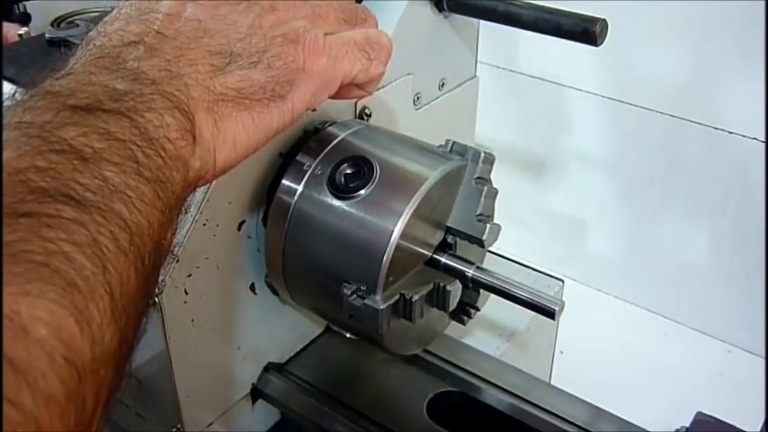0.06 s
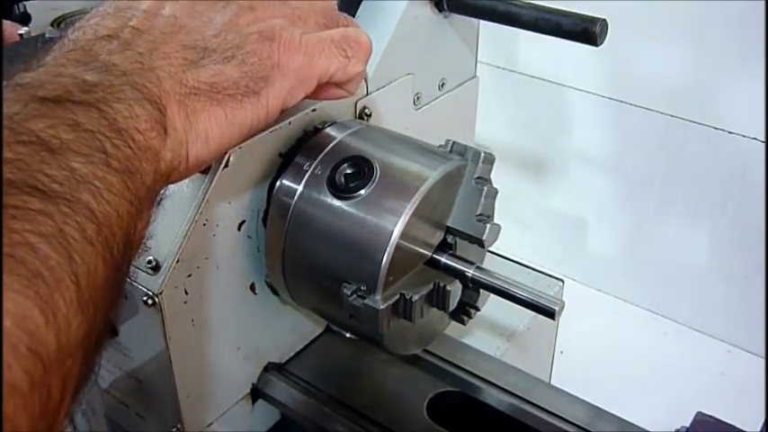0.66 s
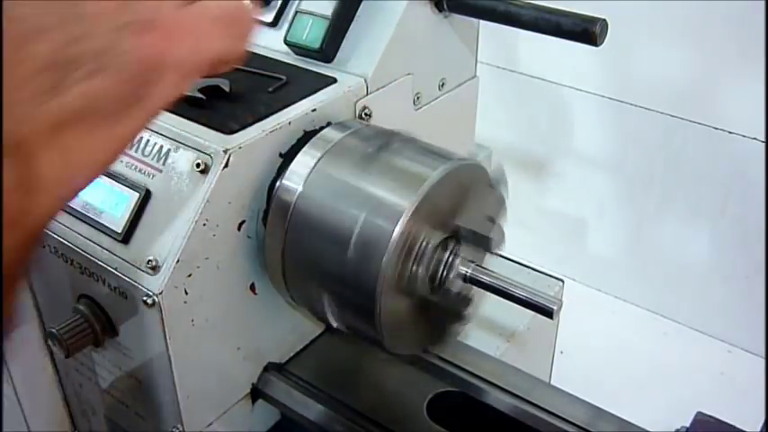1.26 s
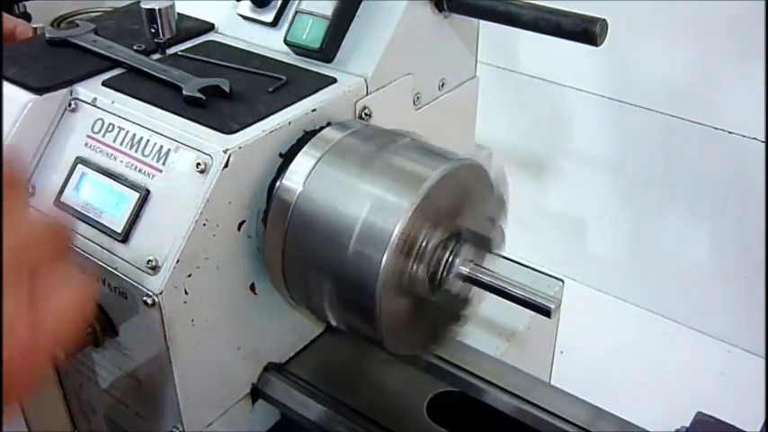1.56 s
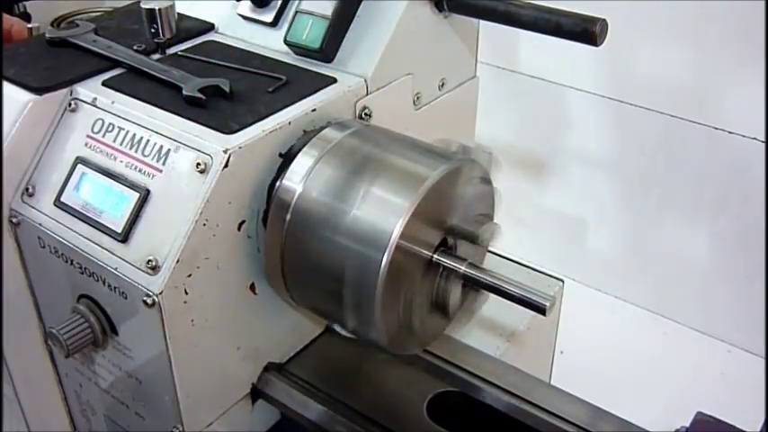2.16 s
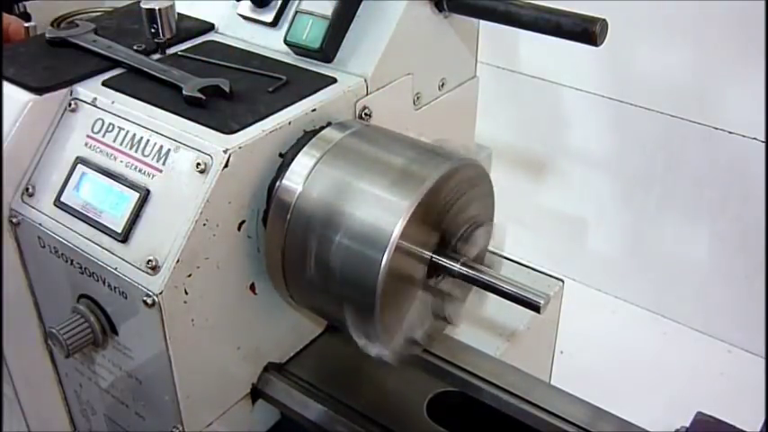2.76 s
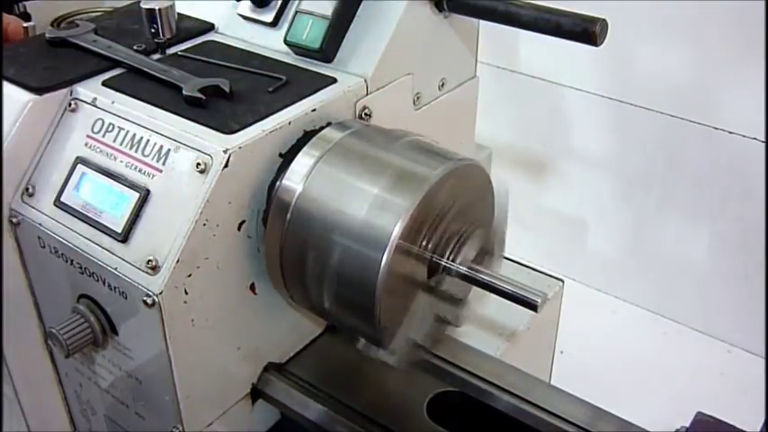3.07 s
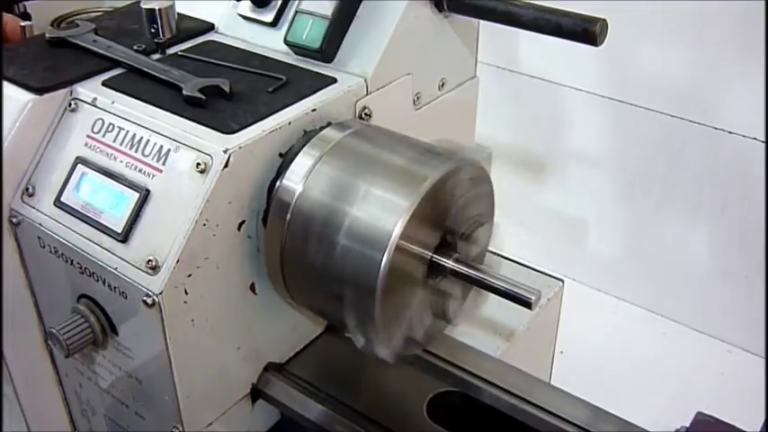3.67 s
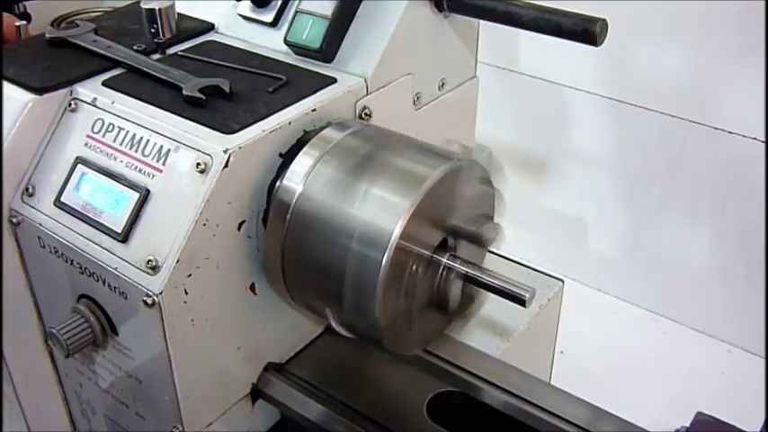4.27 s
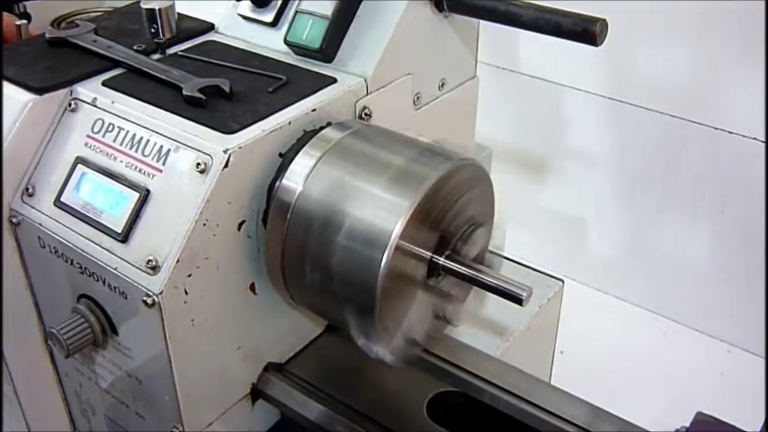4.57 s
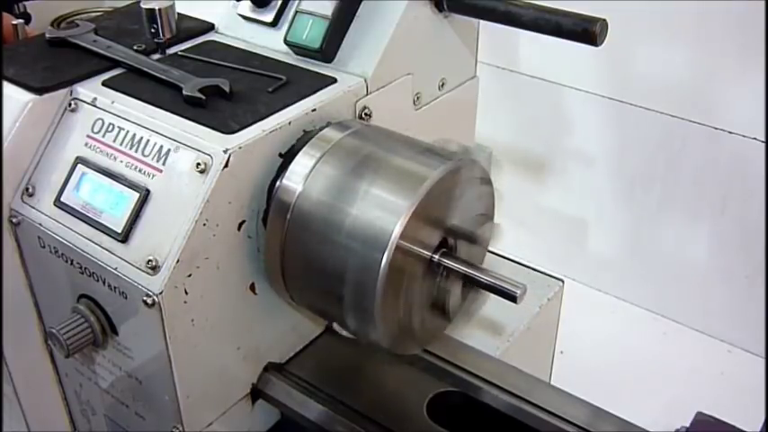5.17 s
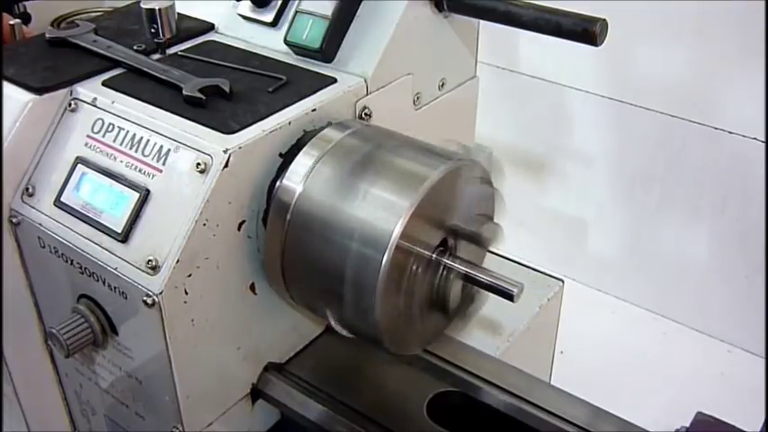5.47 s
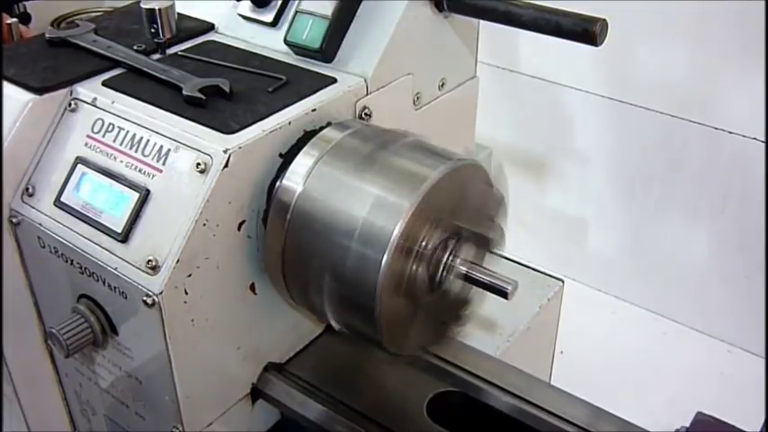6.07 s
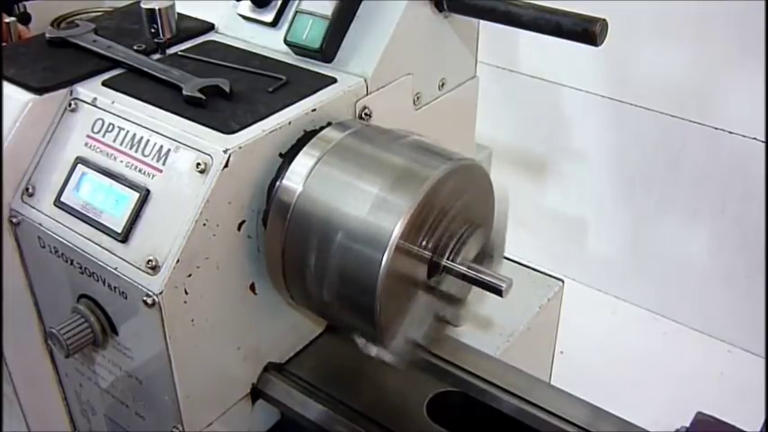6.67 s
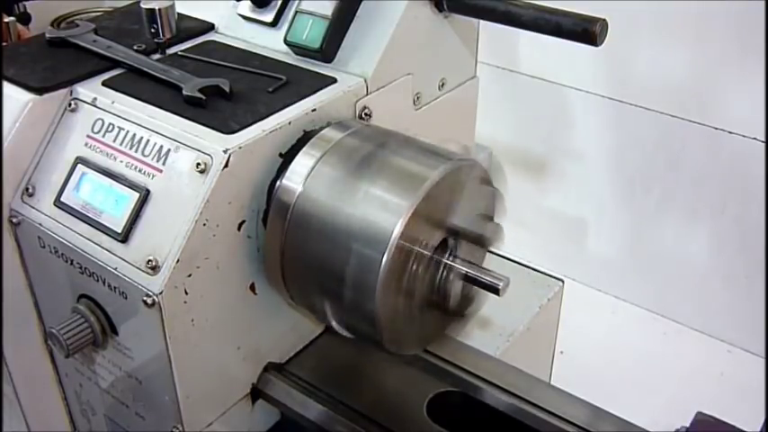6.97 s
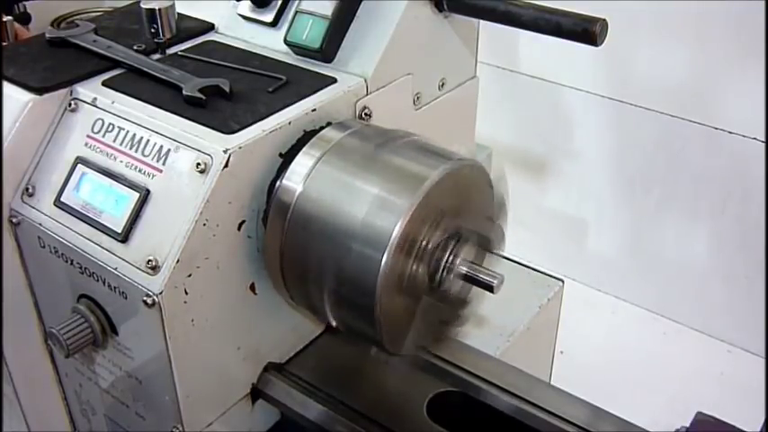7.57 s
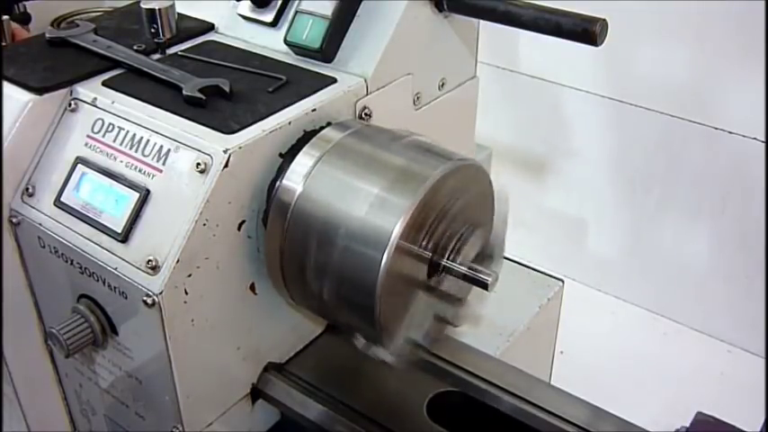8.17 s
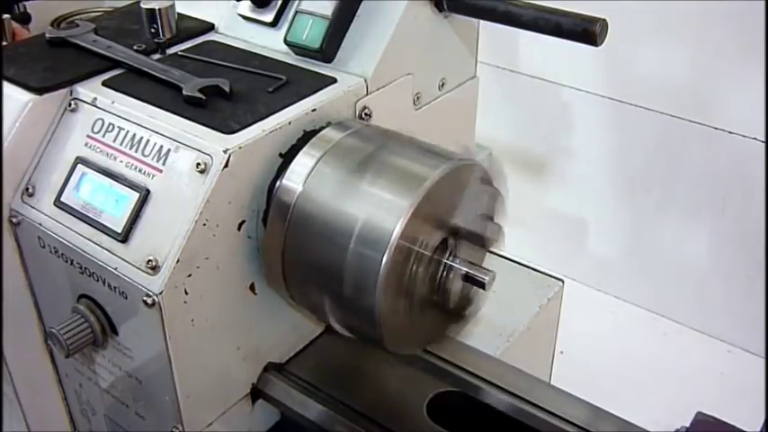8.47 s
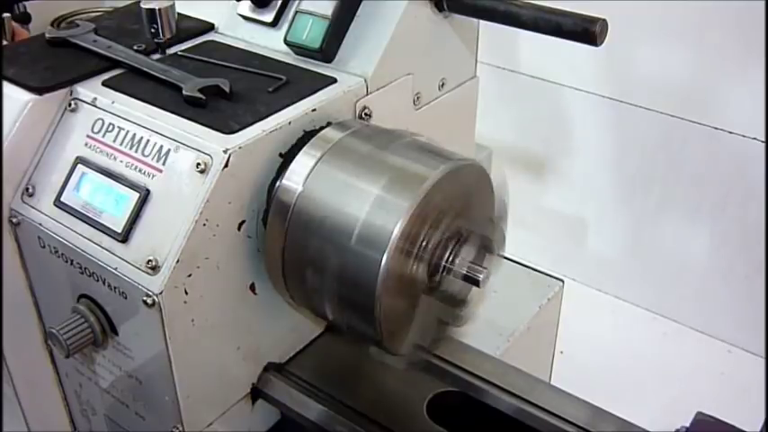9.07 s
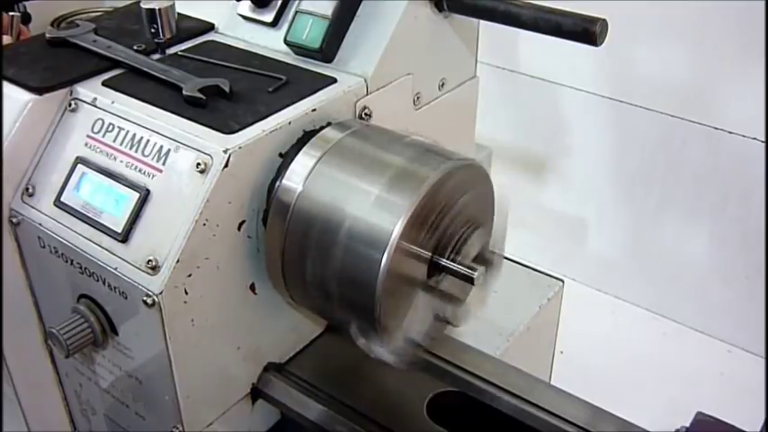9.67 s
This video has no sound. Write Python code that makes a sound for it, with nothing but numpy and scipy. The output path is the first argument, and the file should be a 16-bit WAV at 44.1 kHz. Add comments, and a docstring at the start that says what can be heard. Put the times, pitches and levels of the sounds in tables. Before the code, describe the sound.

After a click, a small lathe's electric motor buzzes to life, its rising whine settling into a steady, slightly wavering run.

```python
"""A small belt-driven metal lathe, switched on in a workshop and running without cutting.
A switch clicks, the mains-fed motor buzzes, and the whine of the drive teeth climbs to a steady,
slightly wavering pitch. Bearings and belt rumble in the sheet-metal headstock; the motor brushes
hiss, reflected by the nearby wall and chip tray. One narrow-band microphone, mono, with the
lathe in the foreground and the faint room tone of the shop behind it."""
import sys
import numpy as np
from scipy import signal
from scipy.fft import rfft, irfft, next_fast_len
from scipy.io import wavfile

SR = 44100
rng = np.random.default_rng(int(sys.argv[2]) if len(sys.argv) > 2 else 0)


def pcm_store(signal):
    """Save signal as 16-bit PCM."""
    levels = np.round(np.clip(np.atleast_2d(signal), -1, 1) * 32767)
    wavfile.write(sys.argv[1], SR, levels.astype(np.int16).T)


N = 432621
TIME = np.arange(N) / SR
WHEEL_TEETH, BELT_TEETH = 32, 141   # teeth passed per shaft turn, per belt lap
TOP_TOOTH_HZ, POWER_ON_S = 685.3, .82
MIC_CUTOFF_HZ = 8000


# Harmonics of the meshing teeth: (multiple of the tooth rate, level [dB], extra under load [dB])
TOOTH_HARMONICS = [(1, 0, 0), (2, -3.5, 3.5), (3, -1.5, -2), (4, -0.5, 1.5), (5, -4, 4), (6, -3.5, 2.5),
                   (7, -0.5, 0.5), (8, -3, 3.5), (9, -0.5, 3.5)]

def tooth_whine(rate, teeth, rough=0.17, rough_rise=0.016, start_rough=1.6, hardening=0.42):
    """Tooth harmonics flare on each mode they cross; the teeth chatter while gathering speed."""
    speed = rate / rate[-1]
    chatter = start_rough * np.clip(1 - speed, 0, 1)
    turn = tone(teeth / WHEEL_TEETH)
    whine = 0
    for k, db, load_db in TOOTH_HARMONICS:
        sharpness = speed ** (hardening * (k - 1))   # faster teeth strike more sharply
        strength = from_db(db + load_db * load(rate)) * sharpness
        pulse = rms_one(1 + 0.097 * k ** 0.47 * turn)   # an off-centre wheel presses harder once a turn
        line = rough_tone(k * teeth, rough + rough_rise * k + chatter)
        whine += strength * pulse * drive_gain(k * rate) * line
    belt_throb = 1 + 0.09 * tone(teeth / BELT_TEETH)
    return whine * belt_throb


# Modes through which the drive radiates: (frequency [Hz], width [Hz], peak gain [dB])
DRIVE_RESONANCES = [(244, 53, -55), (576, 26, -53), (603, 27, -48.5), (653, 11, -50), (686, 52, -50.5),
                    (850, 160, -63.5), (1071, 21, -53), (1650, 130, -60.5), (2366, 154, -58.5),
                    (2710, 50, -65.5), (2930, 55, -82.5), (3880, 40, -69.5), (4027, 120, -66.5),
                    (4500, 140, -72), (4690, 270, -71.5), (5200, 120, -74.5), (6130, 74, -74)]

def drive_gain(hz):
    """How strongly a line radiates while its pitch slides across the modes."""
    power = sum(from_db(db) ** 2 / (1 + (2 * (hz[::100] - centre) / width) ** 2)
                for centre, width, db in DRIVE_RESONANCES)
    return np.interp(TIME, TIME[::100], np.sqrt(power))


def rotation(spin_up_s=.605, belt_wow=0.0053, shaft_wow=0.0018, wander=0.001517, taut=0.63):
    """Tooth rate [Hz] and teeth passed: the motor's pull falls as it nears top speed."""
    rate = TOP_TOOTH_HZ * power_rise(spin_up_s)
    teeth = np.cumsum(rate) / SR
    slack = 1 - taut * load(rate)   # the belt sways more once the load eases
    belt_sway = belt_wow * slack * tone(teeth / BELT_TEETH)
    shaft_sway = shaft_wow * tone(teeth / WHEEL_TEETH)
    sway = belt_sway + shaft_sway + wander * drift(3.0)
    return rate, np.cumsum(rate * (1 + sway)) / SR


def power_rise(time_constant_s):
    """Exponential climb from 0 toward 1 once the motor has power."""
    return 1 - np.exp(-np.maximum(TIME - POWER_ON_S, 0) / time_constant_s)


def load(rate):
    """The drive pulls hard (1) until it has nearly reached its speed (0)."""
    return np.clip(45 * (1 - rate / rate[-1]), 0, 1)


# Buzz of the rectified mains: (multiple of the ripple rate, level [dB], extra during run-up [dB])
MAINS_BUZZ = [(1, -69, -0.5), (2, -53, -1), (3, -64.5, -5), (4, -57.5, 1.5), (5, -60, 2), (6, -70.5, 1),
              (7, -60.5, -2), (8, -66, -1), (10, -76, -0.5), (12, -66, 3.5), (13, -69.5, -0.5),
              (14, -72.5, -12), (16, -76.5, 5), (18, -81, -1), (19, -80.5, 0.5), (22, -82, 4.5),
              (24, -80.5, 0), (25, -82, 2.5)]

def motor_buzz(rate, ripple_hz=100.08, flutter=0.12):
    """Current pulses shake the motor, with a harder edge while it pulls up to speed."""
    pull = np.clip(6 * (1 - rate / rate[-1]), 0, 1)
    return sum(from_db(db + surge_db * pull) * tone(k * ripple_hz * TIME) * (1 + flutter * drift(7.8))
               for k, db, surge_db in MAINS_BUZZ)


# Rumble of the pulley: (multiple of its beat rate, level at top speed [dB])
PULLEY_LINES = [(2, -74.5), (3, -69), (4, -77.5)]
# Uneven teeth and bearings: (multiple of the shaft rate, level at top speed [dB])
UNEVEN_LINES = [(23, -65), (27, -58.5), (28, -69.5), (29, -73), (30, -62), (31, -73), (33, -65.5),
                (34, -65), (35, -67.5), (37, -67.5), (43, -68), (49, -77.5), (50, -72.5), (63, -67.5),
                (69, -68.5), (109, -83), (126, -76.5)]

def shaft_tones(rate, teeth, pulley_beats_per_tooth=.0804, rough=0.51, growth=2.5):
    """Pulley, uneven teeth and bearings add lines that grow with speed."""
    lines = sum(from_db(db) * tone(k * teeth * pulley_beats_per_tooth) for k, db in PULLEY_LINES)
    for k, db in UNEVEN_LINES:
        gain = drive_gain(k * rate / WHEEL_TEETH)
        lines += from_db(db) * gain / gain[-1] * rough_tone(k * teeth / WHEEL_TEETH, rough)
    return lines * (rate / rate[-1]) ** growth


# Smooth spectra of bearing rumble and brush hiss: (frequency [Hz], relative density [dB])
RUMBLE_SPECTRUM = [(45, -22.5), (80, -9), (130, -6), (200, 1.5), (350, -1), (560, -5.5), (800, 0),
                   (1000, -7), (1300, -2.5), (1600, -5), (1900, -8.5), (2600, -13.5), (3400, -18),
                   (8000, -35)]
HISS_SPECTRUM = [(1500, -17), (2500, -10.5), (3400, -12.5), (4300, -5), (5200, -1), (5900, 0), (6500, 3),
                 (7300, 1), (7800, -9), (8300, -22)]

def friction(rate, teeth, rumble_db=-52.5, hiss_db=-58.5, grain=0.074):
    """Bearing and belt rumble and brush hiss grow with speed and swell at a tight spot each turn."""
    speed = rate / TOP_TOOTH_HZ
    rub = np.exp(1.5 * np.cos(2 * np.pi * teeth / WHEEL_TEETH))
    rub = rms_one(rub - rub.mean())
    rumble = from_db(rumble_db) * speed ** 1.05 * noise(RUMBLE_SPECTRUM, in_headstock=True)
    hiss = from_db(hiss_db) * speed ** 1.74 * reflected(noise(HISS_SPECTRUM, in_headstock=True))
    return rumble * (1 + 0.038 * rub) + hiss * (1 + 0.094 * rub + grain * drift(120))


# Resonances of the headstock panels: (frequency [Hz], width [Hz], lift [dB])
HEADSTOCK_MODES = [(245, 24, 9), (478, 152, 12.5), (615, 74, 14.5), (910, 56, 6.5), (1052.5, 73, 15.5),
                   (1194, 66, 6.5), (1483, 130, 7), (1680, 120, 5), (2340, 27, 10.5), (2360, 30, 3.5),
                   (2600, 150, 4), (3010, 13, 8.5), (3773, 90, 14), (4126, 210, 10), (4960, 120, 5.5),
                   (4720, 200, 4), (5350, 64, 2.5), (5400, 170, 5.5), (5660, 52, 4), (6370, 150, 3),
                   (6680, 170, 2.5), (6955, 130, 6), (7540, 400, 4.5)]

def headstock_gain(hz):
    """The sheet metal colours the friction: each resonance lifts the band around it."""
    lift = sum((from_db(db) ** 2 - 1) / (1 + (2 * (hz - centre) / width) ** 2) ** 2
               for centre, width, db in HEADSTOCK_MODES)
    return np.sqrt(1 + lift)


# Wall and chip tray, heard at the microphone after the direct sound: (delay [s], level [dB])
NEAR_REFLECTIONS = [(.0068, -15.5), (0.0119, -14), (0.0192, -16.5)]

def reflected(hiss):
    """Nearby hard surfaces comb the hiss into narrow metallic bands."""
    echoes = sum(from_db(db) * np.roll(hiss, round(delay * SR)) for delay, db in NEAR_REFLECTIONS)
    return rms_one(hiss + echoes)


# Switch contacts: (time [s], level [dB], share of panel ring [0-1], brightness [Hz])
SWITCH_CLICKS = [(.3915, -54, 0.1, 3200), (0.4008, -47.5, 0.64, 6500), (1.072, -61, .02, 3470),
                 (1.125, -45.5, 0.06, 5300)]
# Modes of the switch panel: (frequency [Hz], level [dB], time to fall by 60 dB [s])
PANEL_MODES = [(1125, 7.5, 0.17), (2050, 0, 0.039), (6430, -1, 0.066), (6800, -23, .08), (7400, -18, .1)]

def switch_clicks(snap_t60=0.0054, tail_t60=0.17, tail_db=-13.0, crack_db=0.5):
    """Each contact snaps, sets the panel ringing and leaves a short tail in the room."""
    clicks = np.zeros(N)
    t = np.arange(SR // 2) / SR
    crack_band = signal.butter(1, [900, 4500], "band", fs=SR, output="sos")
    decay = 1000. ** (-t / snap_t60) + from_db(tail_db) * 1000. ** (-t / tail_t60)
    ring = sum(from_db(db) * 1000. ** (-t / t60) * np.sin(2 * np.pi * hz * t)
               for hz, db, t60 in PANEL_MODES)
    for start_s, db, share, bright_hz in SWITCH_CLICKS:
        bright_band = signal.butter(2, [bright_hz / 1.09, bright_hz * 1.09], "band", fs=SR, output="sos")
        white = rng.standard_normal(len(t))
        crack = rms_one(signal.sosfilt(crack_band, white))
        snap = rms_one(signal.sosfilt(bright_band, white)) + from_db(crack_db) * crack
        start = int(start_s * SR)
        clicks[start:start + len(t)] += from_db(db) * (snap * decay + share * ring)
    return clicks


# Room tone of the workshop: (frequency [Hz], relative density [dB])
ROOM_SPECTRUM = [(25, -5), (45, -19.5), (80, -12), (200, -1.5), (400, -6), (800, -10.5), (1600, -16.5),
                 (2600, -19.5), (4000, -22.5), (6500, -24.5), (7400, -26.5), (8200, -41)]

def room_tone(noise_db=-58, whistle_db=-85.5, whistle_hz=6670):
    """Behind the lathe: faint steady shop noise with a thin electronic whistle."""
    return from_db(noise_db) * noise(ROOM_SPECTRUM) + from_db(whistle_db) * tone(whistle_hz * TIME)


def noise(spectrum, in_headstock=False):
    """Noise of a given spectrum, rms 1, optionally ringing in the headstock."""
    size = next_fast_len(N)
    hz = np.fft.rfftfreq(size, 1 / SR) + 1e-3
    points, db = np.transpose(spectrum)
    in_band = (hz > 15) & (hz < MIC_CUTOFF_HZ + 500)
    gain = from_db(np.interp(np.log(hz), np.log(points), db)) * in_band
    if in_headstock:
        gain *= np.interp(hz, hz[::10], headstock_gain(hz[::10]))
    white = rfft(rng.standard_normal(size))
    return rms_one(irfft(white * gain, size)[:N])


def tone(cycles):
    """A sine of rms 1 that follows a count of cycles."""
    phase = 2 * np.pi * ((cycles + rng.random()) % 1)
    return np.sqrt(2) * np.sin(phase.astype(np.float32))


def rough_tone(cycles, rough):
    """A line whose phase and strength flutter."""
    line = tone(cycles + rough * drift(11) / (2 * np.pi))
    return line * (1 + rough * drift(26)) / np.sqrt(1 + rough ** 2)


def drift(hz):
    """Random wander of rms 1, mostly slower than hz."""
    step, settle = 40, 2000
    pole = np.exp(-2 * np.pi * step * hz / SR)
    white = rng.standard_normal(N // step + settle + 2)
    slow = signal.lfilter([1], [1, -2 * pole, pole * pole], white)[settle:]
    return np.interp(np.arange(N) / step, np.arange(len(slow)), rms_one(slow))


def from_db(db):
    """Decibels to gain."""
    return 10 ** (np.asarray(db) / 20)


def rms_one(x):
    """Scale to unit power."""
    return x / np.sqrt(np.mean(x ** 2) + 1e-20)


def scene():
    """From one spot in the workshop: the lathe and its switch in front, room tone behind."""
    rate, teeth = rotation()
    current = power_rise(time_constant_s=.045)
    lathe = tooth_whine(rate, teeth) + shaft_tones(rate, teeth) + friction(rate, teeth) + motor_buzz(rate)
    room = room_tone()
    return (current * lathe + switch_clicks() + room)[None]


def record(dry):
    """A narrow-band microphone input with a constant offset."""
    offset = -.035
    low_pass = signal.ellip(10, .2, 80, MIC_CUTOFF_HZ, fs=SR, output="sos")
    return signal.sosfilt(low_pass, dry) + offset


dry = scene()
out = record(dry)
pcm_store(out)
```